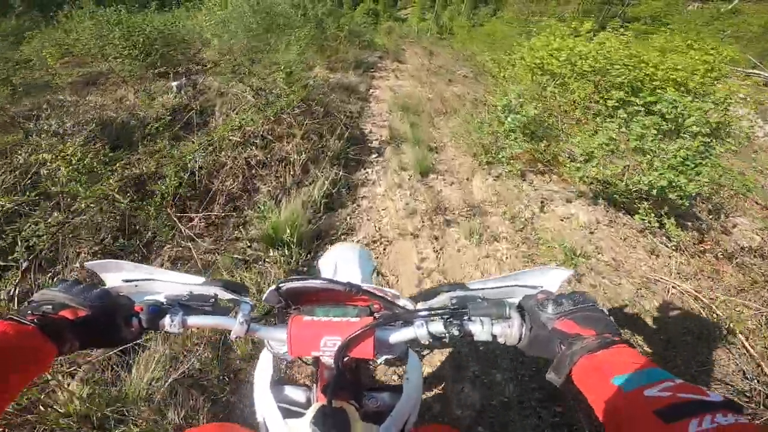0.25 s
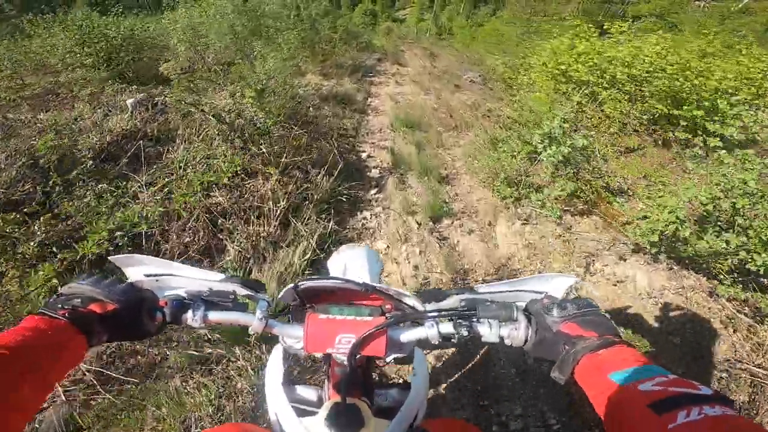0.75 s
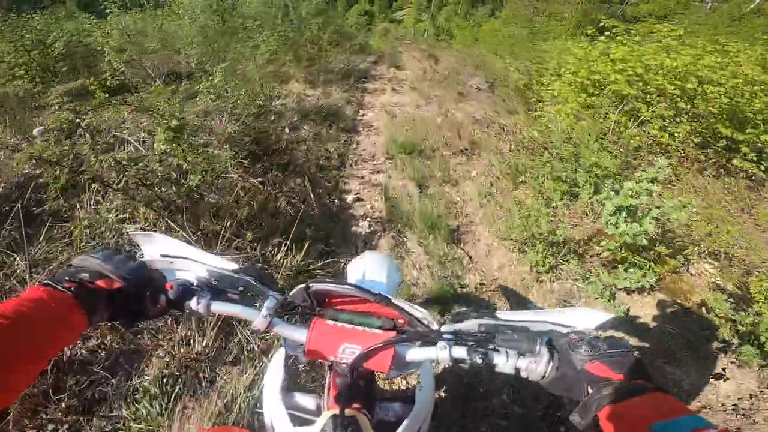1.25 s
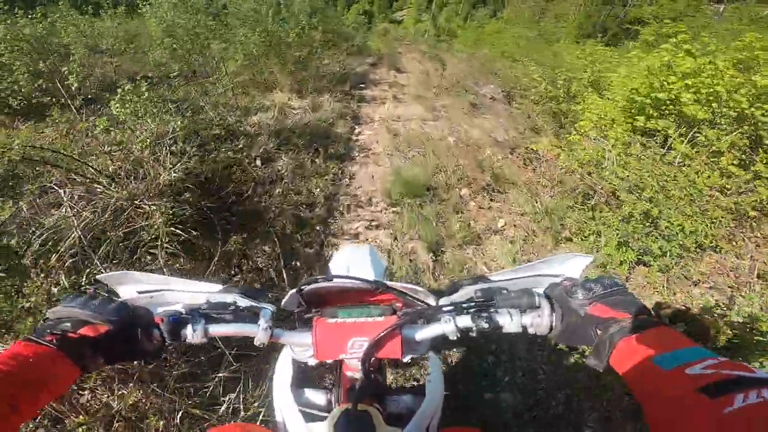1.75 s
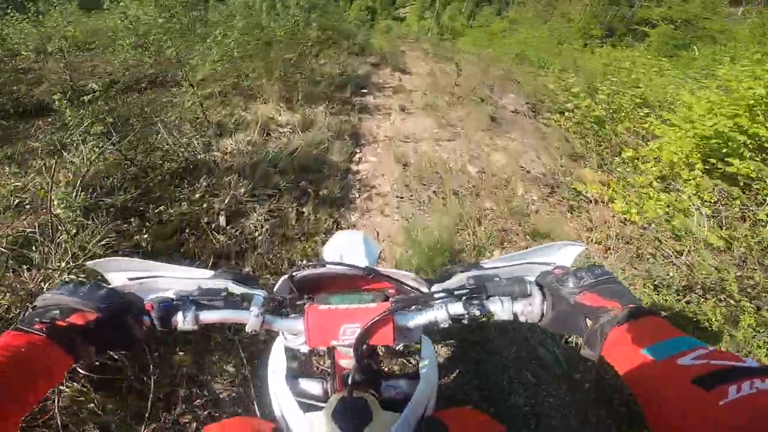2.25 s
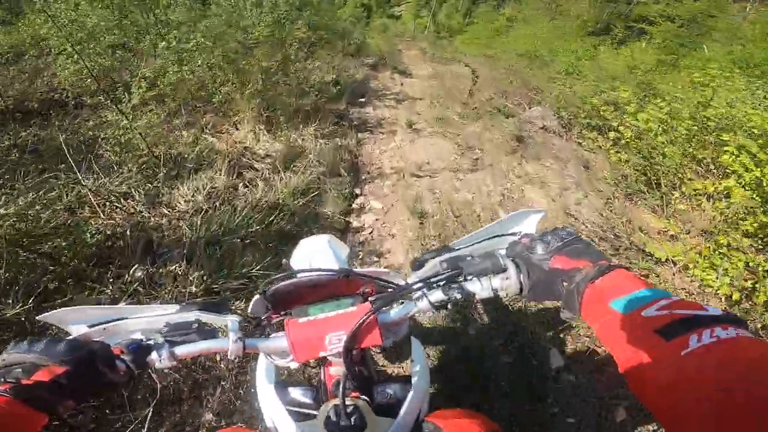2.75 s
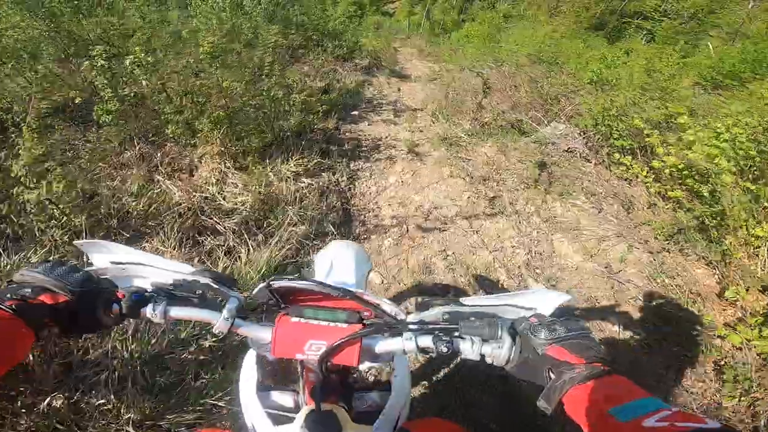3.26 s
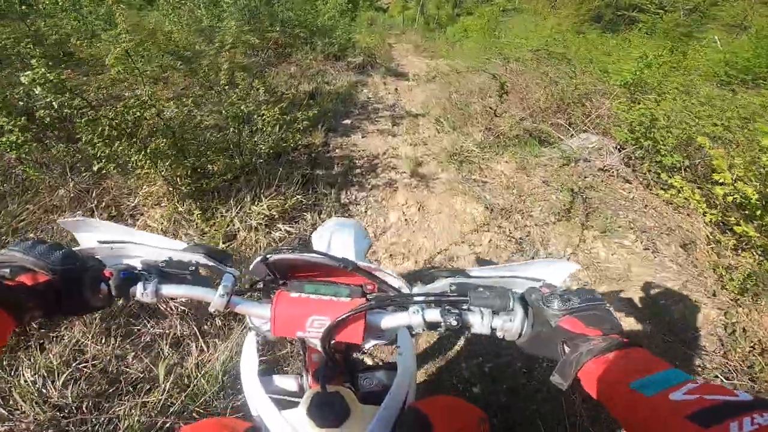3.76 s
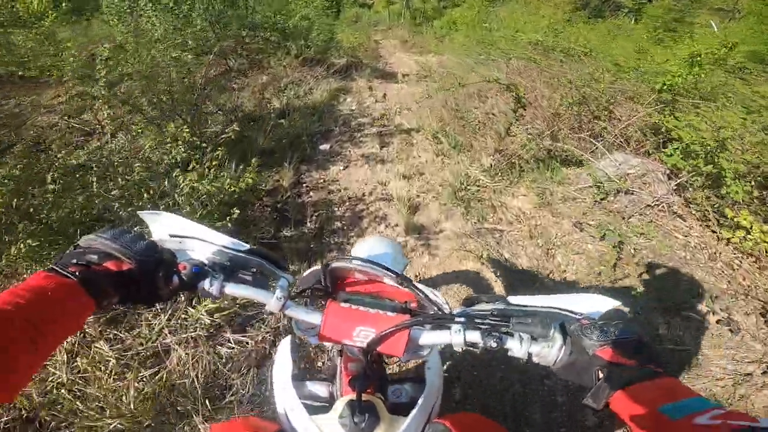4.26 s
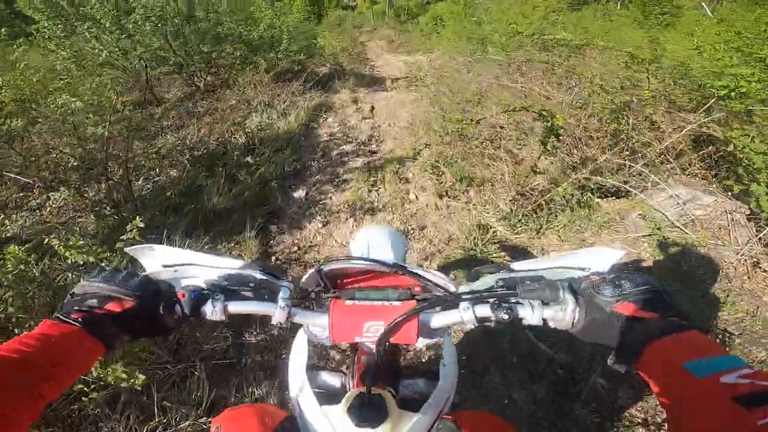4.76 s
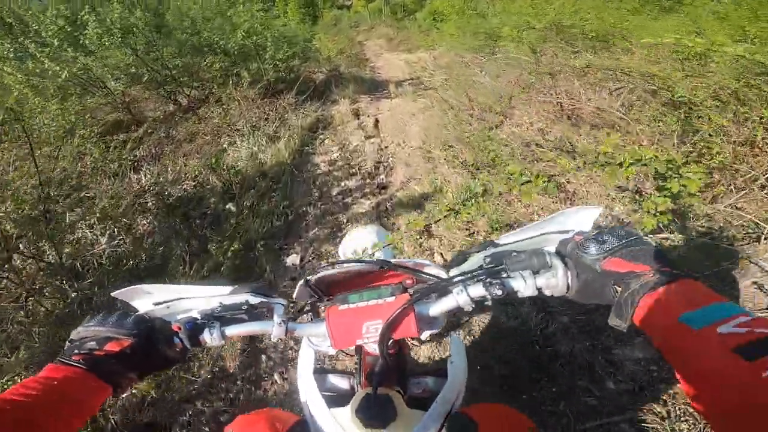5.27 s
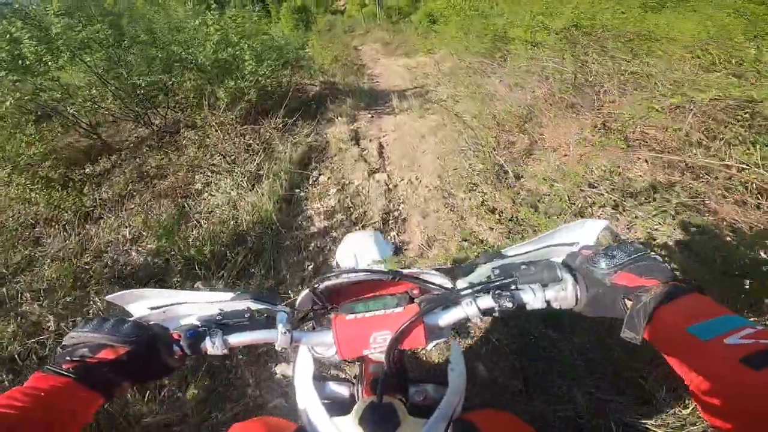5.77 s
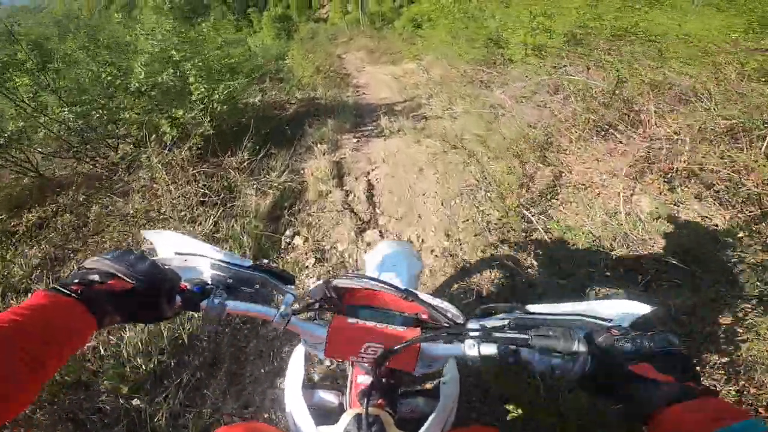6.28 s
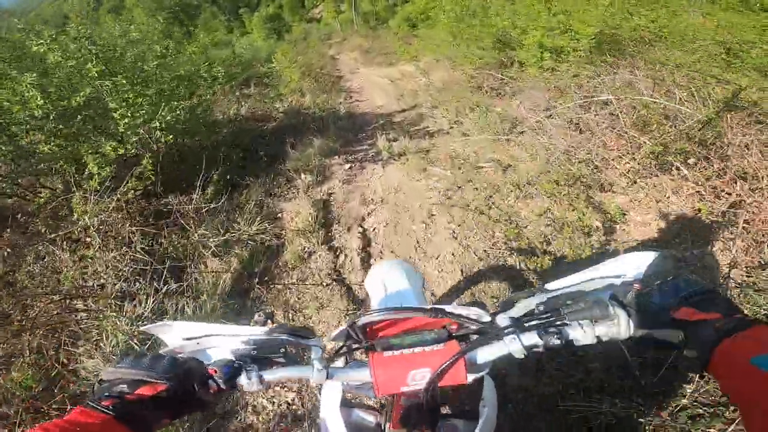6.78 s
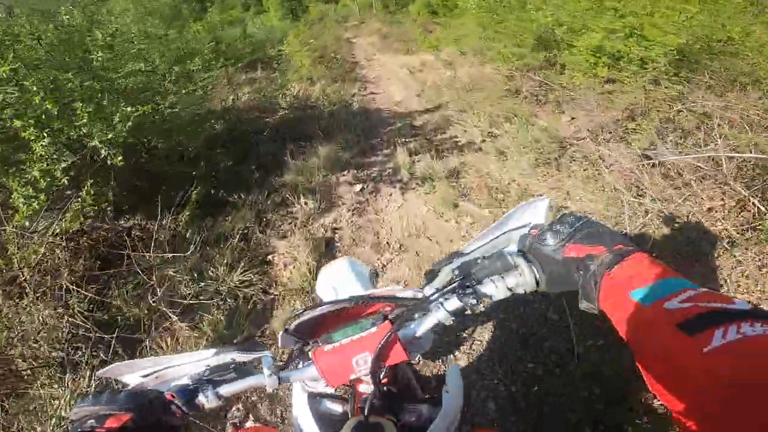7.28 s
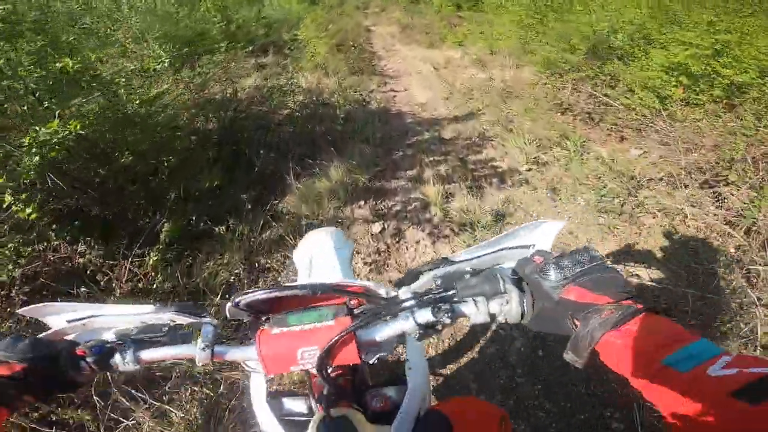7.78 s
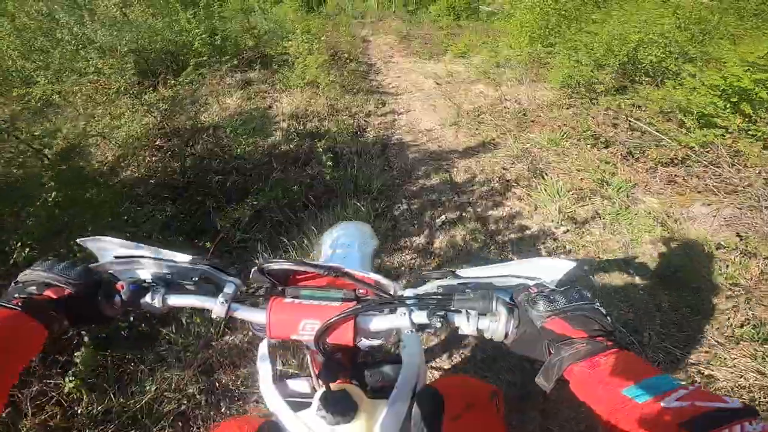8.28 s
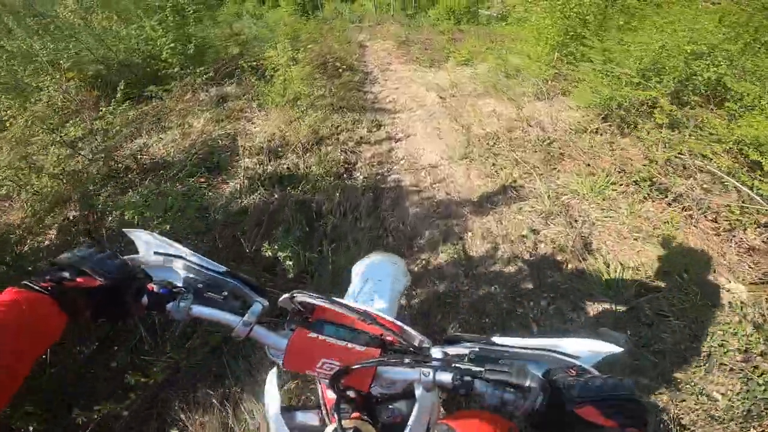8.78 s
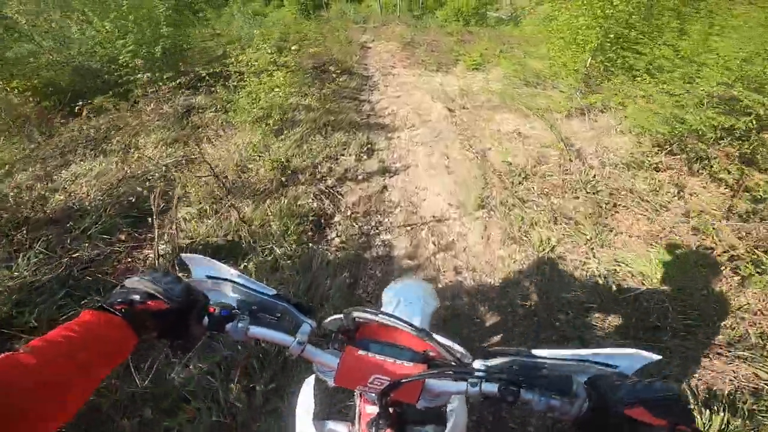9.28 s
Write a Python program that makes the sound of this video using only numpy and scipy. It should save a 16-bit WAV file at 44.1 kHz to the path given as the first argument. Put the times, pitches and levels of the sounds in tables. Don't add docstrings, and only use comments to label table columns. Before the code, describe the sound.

Close, muffled and bass-heavy: a trail bike creeps downhill over stones with almost no throttle, no steady engine note, just irregular low thudding and crunching grit. Mid-pitched case knocks rattle on top, with faint metallic chain chirps, dry twig crackles and thin leaf swishes. Bumps crowd together at five seconds, thin out by seven, burst at eight, then ease into wind gusts and final knocks. Outdoor, chest-mounted microphones.

```python
import sys
import numpy as np
from scipy import signal
from scipy.fft import rfft, irfft, next_fast_len
from scipy.io import wavfile
from scipy.ndimage import map_coordinates

SR = 44100
rng = np.random.default_rng(int(sys.argv[2]) if len(sys.argv) > 2 else 0)


def natural_amplitude(level_db):
    exponent = np.asarray(level_db, float) / 20
    return 10 ** exponent


def put_to_file(sound):
    columns = np.atleast_2d(sound).T
    safe = np.clip(columns, -1, 1)
    whole_steps = np.round(safe * 32767)
    wavfile.write(sys.argv[1], SR, whole_steps.astype(np.int16))


N = 420273

# (time [s], peak level [dB], ring [Hz], low push [dB])
BIG_STONES = [(0.094, -19, 313, -42), (0.422, -11, 151, 3), (0.634, -10.5, 316, 1.5),
              (0.831, -10, 157, -19.5), (0.902, -32, 213, 4.5), (2.018, -10.5, 227, -9),
              (2.605, -12.5, 195, -4.5), (2.837, -21.5, 248, 9), (2.996, -20, 184, -4),
              (3.279, -16, 314, -8), (3.372, -12.5, 174, -8), (3.898, -22, 290, -20),
              (4.403, -18, 281, -16.5), (4.471, -20, 220, -38), (4.564, -9.5, 327, -11),
              (4.703, -14.5, 249, -2.5), (4.85, -12.5, 285, -12.5), (4.96, -18, 458, -2),
              (5.259, -20.5, 213, -23), (5.387, -8.5, 314, 2), (5.561, -21.5, 204, 8.5),
              (5.745, -15, 163, -5.5), (5.777, -16, 167, -17), (5.842, -13.5, 274, -4.5),
              (6.888, -19, 352, -23), (7.472, -21, 296, -3), (7.915, -19.5, 524, -15),
              (7.978, -10, 325, -25), (8.266, -6.5, 233, -18), (8.665, -21, 322, -18)]
# (time [s], peak level [dB], ring [Hz], upper ring [dB])
CASE_KNOCKS = [(0.199, -12.5, 1020, -16.5), (0.816, -19, 920, -21), (2.026, -13, 1103, -20),
               (2.343, -15, 1123, -14), (3.273, -26, 910, -10), (3.493, -18.5, 934, -27),
               (3.512, -16.5, 940, -28), (3.679, -19.5, 1017, -32), (3.902, -18.5, 1060, -15),
               (3.966, -20, 1183, -21), (4.37, -17.5, 1096, -33), (4.492, -17.5, 920, -16),
               (4.559, -19, 1060, -27), (4.86, -20.5, 1140, -2.5), (4.966, -14.5, 960, -36),
               (5.089, -20, 1110, -16.5), (5.174, -21, 1065, -11.5), (5.317, -19, 1160, -19),
               (5.858, -20, 970, -22), (6.43, -19.5, 1290, -22), (6.542, -20, 1220, -30),
               (6.609, -21, 1145, -33), (6.667, -25.5, 950, -16), (7.85, -19, 1015, -39),
               (7.921, -14.5, 960, -33), (8.029, -12.5, 1145, -39), (8.209, -21.5, 973, -28),
               (8.884, -22, 974, -36), (9.294, -21.5, 1175, -8), (9.418, -12.5, 1070, -3.5)]
# (time [s], peak level [dB], brightness [dB])
TWIG_SNAPS = [(0.681, -31, -34), (2.023, -29, -21), (2.0772, -34.5, -28), (2.2248, -26, -21),
              (2.2548, -34, -4.5), (2.8698, -30.5, -14.5), (3.3922, -34.5, -13.5), (3.8616, -41, -11.5),
              (4.288, -38, -16.5), (4.3048, -34.5, -35.5), (4.3705, -32.5, -20), (4.8938, -36, -17.5),
              (5.2096, -52, -18), (5.244, -34, -16.5), (6.018, -27, -22), (6.2262, -34, -22),
              (6.4271, -24, -21.5), (6.5415, -30, -26), (6.6572, -31, -12.5), (7.1719, -34.5, -13.5),
              (7.7335, -32.5, -20), (7.905, -27, -12), (8.1697, -43, -2), (8.5077, -31, -18),
              (8.7113, -36.5, -15), (8.8445, -37, -8.5), (8.8806, -29, -23), (8.9232, -38.5, -31),
              (9.2532, -31, -18), (9.418, -37.5, -12)]


def in_db(gain):
    return 20 * np.log10(gain)


def unit(x):
    return x / np.sqrt(np.mean(x ** 2) + 1e-20)


def along(points, hz):
    f, v = np.transpose(points)
    return np.interp(np.log(hz + 1), np.log(f + 1), v)


def curves(rows):
    s, *cols = np.transpose(rows)
    return [np.interp(np.arange(N) / SR, s, c) for c in cols]


def wobble(rate):
    knots = rng.standard_normal(int(N * 60 / SR))
    return map_coordinates(knots, [np.arange(N) * min(rate, 59) / SR])


def swells(rows, rise_s, fall_s):
    roundness = 1.1
    s, db = np.transpose(rows)[:2]
    t = np.arange(0, N / SR, .002)
    late = t[:, None] - s
    distance = np.maximum(-late / rise_s, late / fall_s)
    gain = (natural_amplitude(db) * np.exp(-distance ** roundness)).sum(axis=1)
    return np.interp(np.arange(N) / SR, t, gain)


def filtered(x, response):
    m = next_fast_len(N + 8192)
    return irfft(rfft(x, m) * response(np.fft.rfftfreq(m, 1 / SR)), m)[..., :N]


def body(x, spectrum):
    size = 4096
    cep = irfft(np.log(natural_amplitude(along(spectrum, np.fft.rfftfreq(size, 1 / SR)))), size)
    cep[1:size // 2] *= 2
    cep[size // 2 + 1:] = 0
    impulse = irfft(np.exp(rfft(cep)), size)
    return signal.fftconvolve(x, impulse / np.linalg.norm(impulse))[:N]


def jolts(rate, spread_db, smooth_db, rarest=.0031):
    when, size, sign = rng.random((3, N))
    sizes = natural_amplitude(-spread_db * np.log(size + rarest))
    hits = (when < rate / SR) * sizes * np.sign(sign - .5)
    return unit(hits) + natural_amplitude(smooth_db) * rng.standard_normal(N)


def ring(hz, t60, rise):
    t = np.arange(SR // 5) / SR
    shape = natural_amplitude(-60 * t / max(t60, .004)) * (1 - np.exp(-t / rise))
    return shape / shape.max() * np.sin(2 * np.pi * hz * t)


def add(track, s, sound):
    part = track[round(s * SR):][:len(sound)]
    part += sound[:len(part)]


def frame(level_db, bumps):
    # (frequency [Hz], level [dB])
    frame_colour = [(50, -36.5), (110, -3), (200, -1), (330, -2), (490, -5), (600, -10.5), (800, -19),
                    (1500, -59), (4000, -120)]
    # (frequency [Hz], level [dB])
    crunch_colour = [(150, -27.5), (300, 3), (520, 4.5), (750, -9.5), (1200, -18), (2500, -29), (6000, -85)]
    # (time [s], peak level [dB], ring [Hz])
    small_stones = [(0.362, -15, 135), (0.675, -21, 133), (1.157, -20.5, 194), (1.306, -17, 156),
                    (1.444, -20, 147), (1.508, -18, 132), (1.539, -22, 248), (1.745, -19, 207),
                    (2.149, -24, 256), (2.188, -24, 305), (2.574, -16, 131), (2.874, -18.5, 132),
                    (2.922, -16, 153), (2.965, -13, 132), (3.066, -18.5, 245), (3.096, -14, 143),
                    (3.531, -19.5, 293), (3.677, -19.5, 374), (4.255, -23, 164), (5.113, -19, 151),
                    (5.441, -17, 156), (5.645, -19.5, 132), (6.417, -26.5, 132), (7.284, -25, 374),
                    (7.789, -22, 427), (8.118, -19, 350), (8.169, -21, 148), (8.586, -19.5, 172),
                    (8.885, -19, 172), (9.296, -19.5, 132)]
    thud_t60_s, stone_push_db = 0.031, -10

    shaking = body(jolts(330, 3.7, 0.05, rarest=.02), frame_colour)
    out = natural_amplitude(level_db + 0.5) * unit(natural_amplitude(0.64 * bumps + 2.34 * wobble(24)) * shaking)
    grit, t = np.zeros(N), np.arange(SR // 10) / SR
    for s, db, hz, push_db in BIG_STONES:
        push = natural_amplitude(push_db) * ring(100, 1.04 * thud_t60_s, 0.0027)
        add(out, s + 0.00326, natural_amplitude(db - 2) * (ring(hz, thud_t60_s, 0.0034) + push))
        add(grit, s, natural_amplitude(db - 6.5 - 60 * t / 0.034) * rng.standard_normal(len(t)))
    for s, db, hz in small_stones:
        push = natural_amplitude(stone_push_db) * ring(95, .03, .003)
        add(out, s + 0.0021, natural_amplitude(db - 3.5) * (ring(hz, 0.03, 0.0023) + push))
    return out + body(grit, crunch_colour)


def case(level_db, bumps):
    # (frequency [Hz], level [dB])
    case_colour = [(500, -15), (700, -11.5), (950, -2.5), (1130, 0.5), (1300, -5.5), (1520, -17.5),
                   (1880, -19), (2200, -34.5), (3000, -31.5), (6000, -120)]
    # (time [s], peak level [dB], ring [Hz], upper ring [dB])
    blip = [
        (7.937, -23, 1190, -36),
        (7.952, -18.5, 986, -31),
        (7.993, -18, 1170, -23),
        (8.049, -22, 1130, -31),
        (8.056, -16, 1150, -16.5),
        (8.075, -17.5, 1100, -18),
        (8.092, -30, 1086, -24),
    ]
    # (time [s], peak level [dB], ring [Hz])
    taps = [(0.058, -25.5, 1160), (0.094, -21.5, 860), (0.306, -24, 1050), (0.401, -23, 1010),
            (0.636, -25, 1030), (1.472, -26, 1230), (1.516, -21, 1250), (2.524, -27, 1210),
            (3.175, -26.5, 1000), (4.066, -28, 1130), (4.587, -20.5, 1120), (4.724, -23, 1230),
            (4.759, -27.5, 1170), (5.212, -23, 1090), (5.365, -24, 1190), (5.438, -24.5, 1220),
            (5.781, -26.5, 1180), (6.1, -30, 1090), (6.419, -21.5, 1200), (6.698, -25.5, 1000),
            (6.722, -23.5, 1265), (6.886, -23, 1195), (6.952, -27, 980), (7.184, -28, 1116),
            (7.254, -29.5, 1080), (7.978, -20.5, 1130), (8.154, -24, 996), (8.25, -26, 1170),
            (9.26, -28, 993), (9.279, -24.5, 1196)]
    tap_upper_db = -18

    chatter = body(jolts(800, 3.6, 0.11, rarest=.03), case_colour)
    out = natural_amplitude(level_db + 1.5) * unit(natural_amplitude(2.0 * bumps + 2.2 * wobble(30)) * chatter)
    light = [(*tap, tap_upper_db) for tap in taps]
    for s, db, hz, upper_db in [*CASE_KNOCKS, *blip, *light]:
        main = ring(hz, 0.021, 0.00064)
        low = natural_amplitude(-10.5) * ring(514, 0.018, 0.0018)
        upper = ring(1880, 0.0099, 0.00041) + 0.5 * ring(2900, 0.0078, 0.00036)
        add(out, s, natural_amplitude(db + 1.0) * (main + low + natural_amplitude(upper_db) * upper))
    return out


def chain():
    # (time [s], peak level [dB], ring [Hz])
    links = [(0.398, -36, 3270), (0.4244, -35, 3100), (0.5337, -32, 3060), (0.6804, -30, 3020),
             (0.815, -31, 3250), (1.035, -35, 3170), (1.489, -32, 3260), (2.3477, -29, 3560),
             (2.3974, -33, 2950), (2.8464, -31, 3330), (2.9277, -32, 3390), (2.9701, -34, 3460),
             (4.305, -28, 3300), (4.5366, -35, 3300), (4.5835, -34.5, 3040), (4.6164, -31, 3380),
             (4.7222, -32, 3200), (4.8594, -37, 3000), (5.009, -35, 3240), (5.382, -35, 3360),
             (5.8406, -33, 3430), (6.155, -33, 3490), (6.412, -28, 3020), (6.4544, -31, 3320),
             (6.6568, -32, 3120), (7.1814, -35, 3270), (7.6525, -40, 3220), (7.8893, -32.5, 3290),
             (8.0536, -31, 2910), (8.5258, -29, 3250), (8.7575, -32, 3550), (8.7744, -36, 3430),
             (8.792, -34, 3510), (8.8828, -28.5, 3260), (8.9077, -38, 3440), (8.9226, -35, 3360),
             (9.0137, -35, 3110), (9.3082, -37.5, 2960)]
    t60_s, sag, scrape_db = 0.02, 0.053, -8.5

    out = np.zeros(N)
    for s, db, hz in links:
        chirp = ring(hz, t60_s / 2, .0006) + ring(hz * (1 - sag), t60_s, 0.0026)
        scrape = natural_amplitude(scrape_db) * ring(0.51 * hz, .012, .0005)
        add(out, s, natural_amplitude(db - 3.5) * (chirp + scrape))
    return out


def brush(level_db, bumps):
    # (frequency [Hz], level [dB])
    rasp_colour = [(1200, -33), (1900, -0.5), (2500, -1.5), (3200, 6.5), (3500, 4), (4200, -10.5),
                   (5500, -44), (16000, -87.5)]
    # (frequency [Hz], level [dB])
    grit_colour = [(2000, -37), (3500, -3), (4300, -1), (5500, -4), (8100, -12.5), (11000, -17),
                   (16000, -56)]
    # (frequency [Hz], level [dB])
    snap_colour = [(2500, -31), (4300, 10), (7500, -3), (11000, -18.5), (16000, -50)]

    rasp = unit(natural_amplitude(1.6 * bumps + 2.4 * wobble(18)) * body(jolts(900, 3.3, .8, rarest=.02), rasp_colour))
    grit = unit(natural_amplitude(0.8 * bumps + 1.4 * wobble(12)) * body(jolts(2000, 4.0, 0.68), grit_colour))
    dull, bright, t = np.zeros(N), np.zeros(N), np.arange(SR // 10) / SR
    for s, db, bright_db in TWIG_SNAPS:
        envelope = natural_amplitude(db + 3.0 - 60 * t / 0.031) * (1 - np.exp(-t / 0.0011))
        snap = envelope * rng.standard_normal((2, len(t)))
        add(dull, s, snap[0])
        add(bright, s, natural_amplitude(bright_db + 7.0) * snap[1])
    steady = natural_amplitude(level_db + 4.0) * (rasp + natural_amplitude(-9.0) * grit)
    return steady + body(dull, rasp_colour) + body(bright, snap_colour)


def leaves():
    # (time [s], level [dB], length [s])
    passes = [(0.09, -79, 0.18), (1.193, -70.5, 0.12), (1.717, -68, 0.15), (2.103, -74.5, 0.098),
              (3.445, -66, 0.092), (3.864, -60, 0.0043), (3.957, -67.5, 0.045), (4.657, -67, 0.086),
              (5.61, -80.5, 0.6), (6.54, -59.5, 0.058), (6.915, -74.5, 0.085), (7.887, -73, 0.16),
              (8.798, -65.5, 0.087), (9.07, -71, 0.068), (9.502, -72.5, 0.055)]
    # (frequency [Hz], level [dB])
    swish_colour = [(3000, -42), (5000, 6), (8000, 1), (12600, 3), (12900, -4), (13500, -29.5), (13800, -9),
                    (16000, -19.5)]
    far_db = -77

    length = np.transpose(passes)[2]
    near = natural_amplitude(far_db) + swells(passes, length, length)
    flutter = natural_amplitude(3.2 * wobble(22))
    return natural_amplitude(13.5) * near * unit(flutter * body(jolts(790, 4.5, 5.1), swish_colour))


def wind(level_db):
    # (frequency [Hz], level [dB])
    buffet_colour = [(12, -1.5), (30, -0.5), (60, 1.5), (105, 1), (160, -7.5), (300, -16.5), (500, -59)]

    lumps = natural_amplitude(1.75 * wobble(7.9))
    noise = rng.standard_normal((3, N))
    common, left, right = filtered(noise, lambda hz: natural_amplitude(along(buffet_colour, hz)))
    apart = unit(lumps * np.array([left, right]))
    return natural_amplitude(level_db) * unit(lumps * common), natural_amplitude(level_db - 18.0) * apart


def ports(x):
    # (frequency [Hz], level [dB])
    right_colour = [(100, -1.5), (400, -2.5), (900, -5), (1700, -2), (2300, -9.5), (3100, -13.5),
                    (3900, -6.5), (4750, 8.5), (5500, -0.5), (6750, -1.5), (6950, -15.5), (15000, -15)]
    # (frequency [Hz], likeness [-1..1])
    likeness = [(300, 0.99), (1200, 0.99), (1850, 0.87), (2280, -0.86), (2800, 0.38), (3400, 1),
                (4050, 0.19), (4800, -0.85), (5300, -0.73), (6750, -0.38), (7000, 0.72), (12000, .6)]

    z = signal.stft(x, nperseg=256)[2]
    scrambled = z * np.exp(2j * np.pi * rng.random(z.shape))
    other = signal.istft(scrambled, nperseg=256)[1][:N]
    other *= np.linalg.norm(x) / np.linalg.norm(other)

    def paths(hz):
        alike = np.clip(along(likeness, hz), -1, 1)
        return natural_amplitude(along(right_colour, hz)) * np.array([alike, np.sqrt(1 - alike ** 2)])

    right = filtered(np.array([x, other]), paths).sum(axis=0)
    return np.array([x, right])


def scene():
    # (time [s], engine load [dB], roughness of the track [dB])
    ride = [(0.0, -26, -35.5), (0.53, -35.5, -36.5), (0.93, -31, -38), (2.68, -31.5, -36.5),
            (3.48, -32.5, -41.5), (3.77, -38.5, -40), (4.22, -35.5, -39), (4.43, -31, -37),
            (4.72, -30, -34), (5.63, -34, -41), (6.18, -39.5, -39.5), (6.79, -36.5, -38),
            (7.01, -39.5, -44.5), (7.75, -40.5, -41), (8.09, -28.5, -37), (8.49, -32.5, -40.5),
            (9.21, -44, -44), (9.53, -37, -39)]
    # (time [s], level [dB], length [s], chain clatter [dB])
    rut_rows = [(0.123, -32.5, 0.025, -2), (0.391, -24.5, 0.028, 6.5), (0.828, -30, 0.1, 4),
                (1.363, -30, 0.13, 6), (1.764, -32, 0.022, 6), (2.038, -31, 0.057, -19),
                (2.4, -42, 0.11, 15), (2.93, -29.5, 0.025, -4), (3.067, -28, 0.0068, -9),
                (3.478, -38.5, 0.19, -10), (3.917, -32.5, 0.043, 7), (4.595, -32, 0.016, 5),
                (4.714, -40, 0.038, 2), (4.986, -32, 0.032, -7), (5.337, -35, 0.05, 6.5),
                (5.836, -27.5, 0.02, 9), (6.018, -42.5, 0.017, 24), (6.417, -37, 0.019, 13),
                (6.597, -36, 0.044, 3), (6.7, -41.5, 0.041, 9.5), (6.952, -37, 0.023, 4),
                (7.795, -29.5, 0.015, -19), (8.01, -22.5, 0.068, -3.5), (8.208, -30, 0.019, -10),
                (8.51, -49, 0.033, 14.5), (8.896, -49.5, 0.0092, 5), (9.288, -32.5, .03, -8)]
    # (time [s], level [dB])
    stems = [(0.0, -51.5), (0.74, -48.5), (1.22, -51.5), (1.38, -48), (2.87, -50), (4.19, -57),
             (4.67, -48.5), (5.76, -55.5), (6.53, -51), (7.14, -55), (8.15, -53.5), (8.39, -56.5),
             (8.89, -52.5), (9.53, -54)]
    # (time [s], level [dB])
    air = [(0.0, -38.5), (0.61, -31.5), (1.96, -31), (2.1, -32.5), (2.79, -27.5), (3.53, -35), (4.3, -38.5),
           (4.91, -29.5), (7.01, -41.5), (7.17, -42), (7.88, -46.5), (8.04, -45.5), (8.15, -35),
           (8.49, -39), (9.1, -28), (9.53, -33.5)]
    # (time [s], level [dB])
    gusts = [(.66, -31), (.86, -42), (1.1, -23), (1.35, -34.5), (1.78, -30.5), (1.88, -23.5), (2.04, -30),
             (2.33, -27.5), (2.64, -26.5), (2.97, -22.5), (3.11, -29.5), (3.95, -29), (4.6, -51),
             (4.94, -24.5), (5.04, -22.5), (5.25, -35), (6.0, -34), (6.41, -36), (6.95, -30.5),
             (7.54, -35.5), (7.88, -34.5), (8.17, -28.5), (8.31, -34), (8.68, -35.5), (8.86, -25.5),
             (9.0, -35), (9.29, -22.5), (9.42, -20.5), (9.52, -22.5)]
    rut_case_db, rut_brush_db = -11, -25

    (load_db, rough_db), (stems_db,), (air_db,) = curves(ride), curves(stems), curves(air)
    s, db, length, clatter_db = np.transpose(rut_rows)
    ruts = swells(rut_rows, 0.63 * length, length)
    clatter = swells(np.transpose([s, db + clatter_db]), 0.54 * length, length)
    bumps = wobble(15)

    thud_shake = natural_amplitude(-22.5) * swells(BIG_STONES, 0.022, 0.044)
    knock_shake = natural_amplitude(-34.0) * swells(CASE_KNOCKS, 0.0063, 0.013)
    twig_lash = natural_amplitude(-29.0) * swells(TWIG_SNAPS, 0.006, 0.014)
    frame_db = in_db(natural_amplitude(load_db + 1.0) + ruts)
    case_db = in_db(natural_amplitude(rough_db + 0.5) + natural_amplitude(rut_case_db) * ruts + knock_shake)
    brush_db = in_db(natural_amplitude(stems_db + 1.5) + natural_amplitude(rut_brush_db) * clatter + twig_lash)
    wind_db = in_db(natural_amplitude(air_db + 2.5) + swells(gusts, 0.022, 0.021) + thud_shake)

    machine = frame(frame_db, bumps) + case(case_db, bumps) + chain()
    foliage = brush(brush_db, bumps) + leaves()
    common, apart = wind(wind_db)
    return ports(machine + foliage + common) + apart


def low_pass(x):
    return signal.sosfilt(signal.butter(12, 15300, fs=SR, output="sos"), x)


def record(dry):
    shelf_hz, shelf_db = 8250, -11.5
    rounded = dry / (1 + np.abs(dry / .8) ** 4) ** (1 / 4)

    def shelf(hz):
        return natural_amplitude(shelf_db / (1 + np.exp(np.clip((shelf_hz - hz) / 40, -50, 50))))

    mix = filtered(rounded, shelf)
    return low_pass(mix)


dry = scene()
out = record(dry)
put_to_file(out)
```